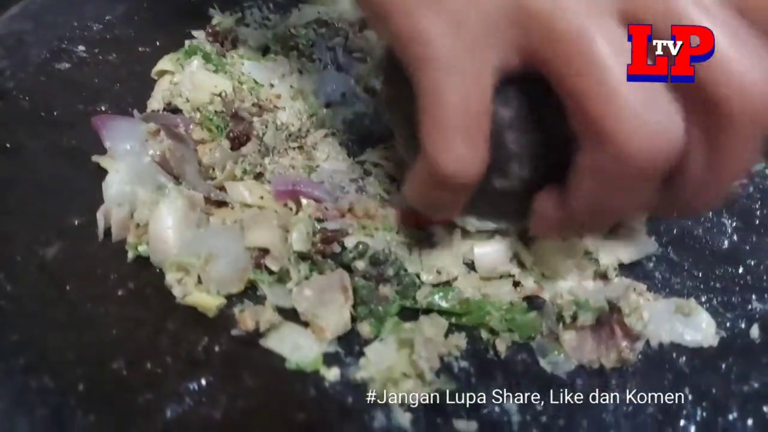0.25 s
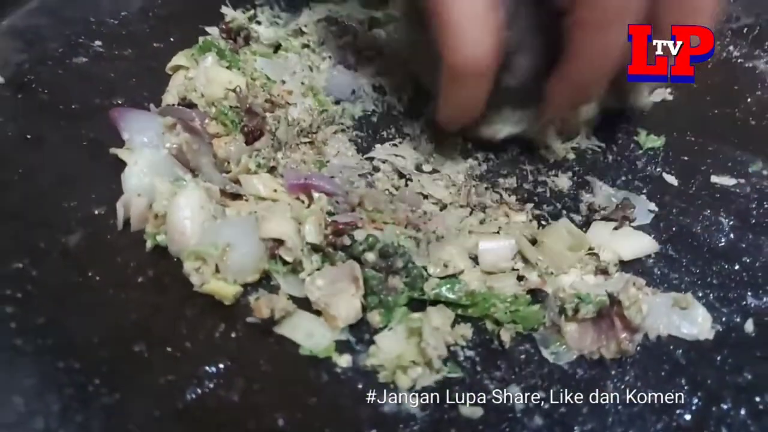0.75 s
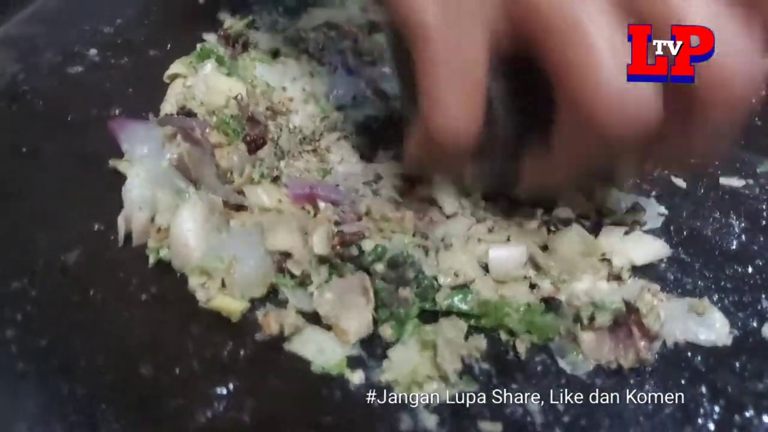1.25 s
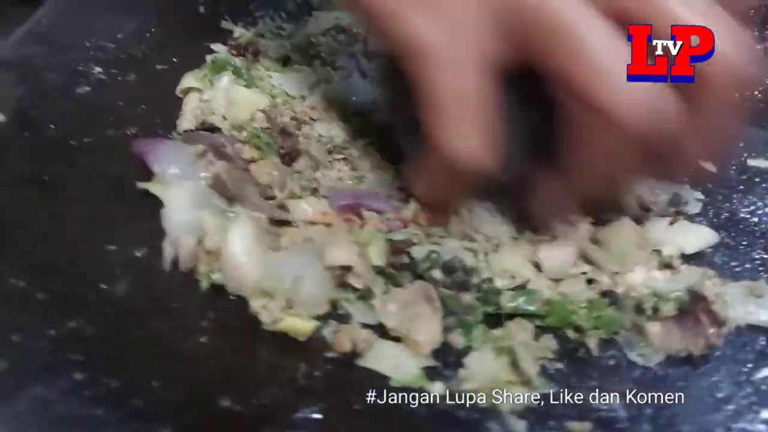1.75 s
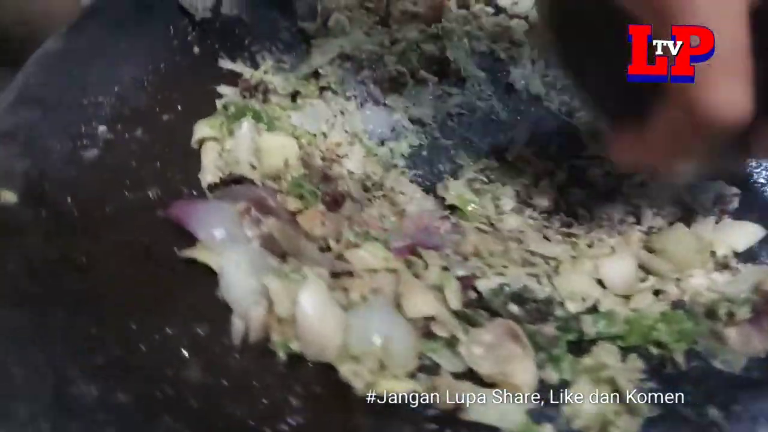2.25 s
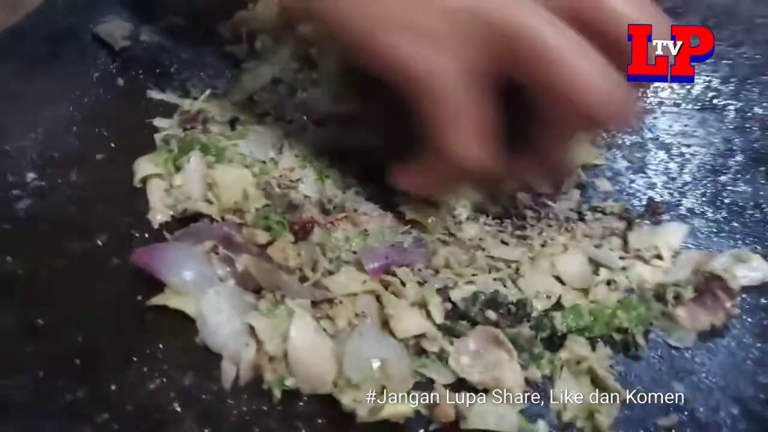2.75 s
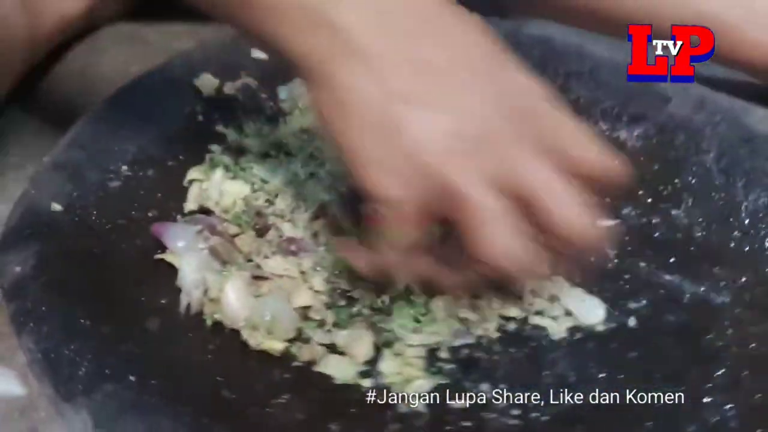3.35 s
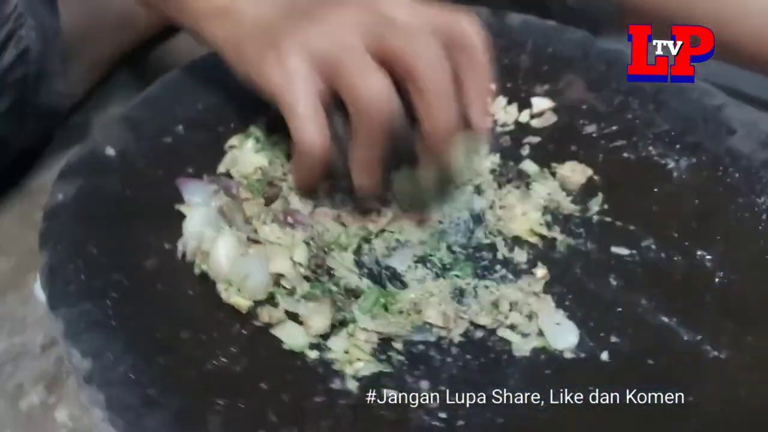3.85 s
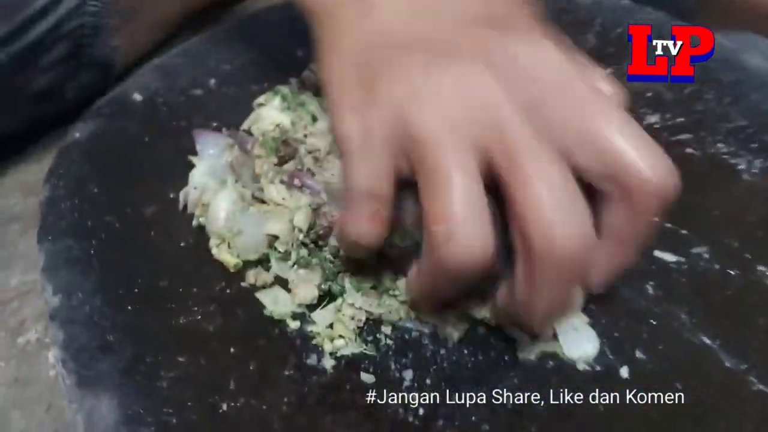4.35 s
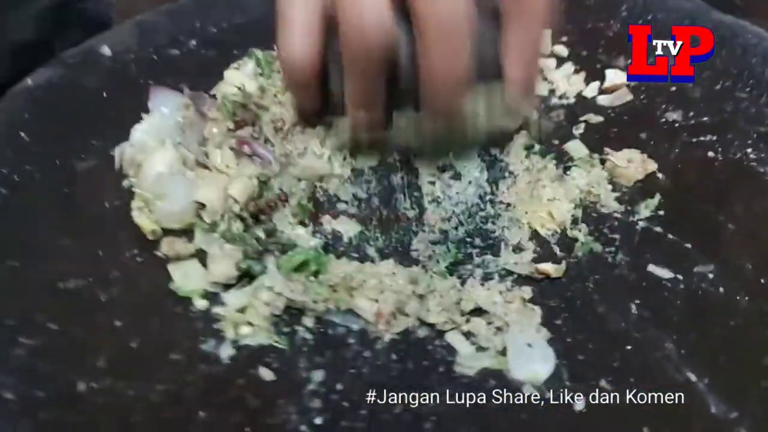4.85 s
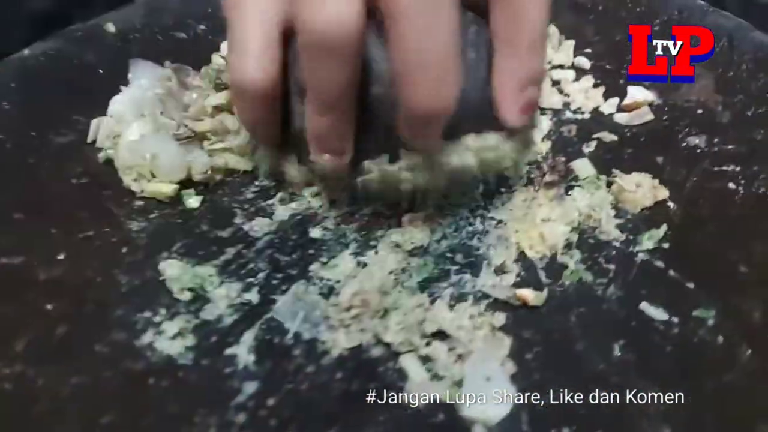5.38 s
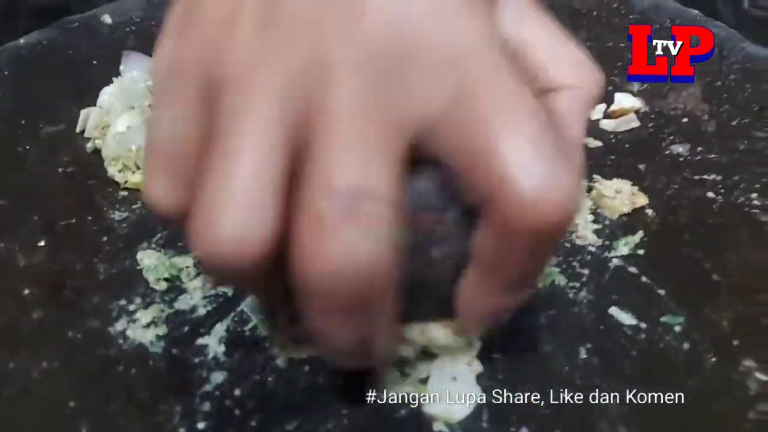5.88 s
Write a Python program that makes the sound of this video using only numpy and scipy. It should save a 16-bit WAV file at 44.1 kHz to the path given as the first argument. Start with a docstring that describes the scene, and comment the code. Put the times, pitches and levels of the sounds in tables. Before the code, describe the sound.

After a quiet start with faint low engine drone, a stone thumps down on a thick slab, then knocks and scrapes through paste about three times a second. Several strikes clack with a short hard ring. The second half is duller, faster, wetter grinding, hissy and crackling, leaning left. A tiny squeak, a heavy microphone bump and skin rubbing on the left follow. Close microphone, slight room reflection.

```python
"""In a room, a hand stone pounds and grinds spice paste on a thick round stone slab, close to a two-port microphone.
Each blow gives a noise crack, a thud of low modes of the slab on the ground, and a short ring of its own modes.
Strokes swell a hiss, crunch and rumble of noise; grit crackles, seeds snap and the stone squeaks once.
A finger brushes and taps the left port; far off an engine drones on sine orders, over a bed of air noise."""
import sys
import numpy as np
from scipy import signal
from scipy.fft import rfft, irfft, next_fast_len
from scipy.io import wavfile

SR = 44100
rng = np.random.default_rng(int(sys.argv[2]) if len(sys.argv) > 2 else 0)


def store_pcm(level_fs):
    """Save levels as 16-bit WAV."""
    pcm = np.round(np.clip(level_fs, -1, 1) * 32767).astype(np.int16)
    wavfile.write(sys.argv[1], SR, np.atleast_2d(pcm).T)


N = 269892

# blows of the hand stone, relative levels: (t/s, thud level/dB, knock level/dB, ring level/dB, crack level/dB,
# strike angle round the slab/rad, hardness/dB per octave)
BLOWS = [(0.744, -13, -53, -35.5, -17, 0.96, -3.5), (0.79, -47, -56, -44, -47, 0.76, 0),
         (0.83, -25.5, -35, -36, -32, 1, 5.5), (0.866, -36, -40, -46.5, -43, 0.91, -1),
         (1.118, -10, -18.5, -21, -12.5, 1.07, -10), (1.228, -32.5, -64, -44.5, -47, 0.71, 7.5),
         (1.453, -27, -14, -8.5, -36, 1.19, -3.5), (1.767, -18.5, -43.5, -45.5, -27.5, 0.83, 5),
         (1.856, -43, -38.5, -46.5, -20.5, 1, 13.5), (2.07, -17.5, -27, -49, -21, 0.3, 14.5),
         (2.309, -27.5, -52, -61.5, -55, .8, -4), (2.363, -12.5, -16.5, -29.5, -15, .8, -10),
         (2.659, -35, -14, -12, -34, 0.68, 0.5), (2.957, -24.5, -48, -40.5, -18.5, 0.33, -12),
         (3.297, -31.5, -12, -8.5, -27, 0.39, -1.5), (3.447, -30.5, -52, -48, -49, 1, -5),
         (3.634, -26.5, -33.5, -49.5, -19, 0.36, 16.5), (4.045, -36, -66, -53, -49, 0.88, -6),
         (4.347, -64, -56, -58, -33.5, 1.1, 2), (4.38, -23.5, -19, -30, -49, 0.25, -13),
         (4.392, -23.5, -24.5, -59, -50, .2, -10), (4.425, -21, -37, -54, -50, .2, -7),
         (4.698, -24.5, -33, -47, -63, 0.84, -19), (5.044, -20, -50, -47, -49, .8, -6),
         (5.412, -28, -42, -51, -39.5, .8, -7)]


def from_db(db):
    """Decibels to gain."""
    return 10 ** (np.asarray(db) / 20)


def rms_one(x):
    """Scale to rms 1."""
    return x / np.sqrt(np.mean(x ** 2) + 1e-20)


def in_time(rows):
    """Table columns as curves, one value a sample."""
    s, *columns = np.transpose(rows)
    return [np.interp(np.arange(N) / SR, s, c) for c in columns]


def at_hz(points, hz):
    """Read a spectrum on a log-frequency axis."""
    table_hz, values = np.transpose(points)
    return np.interp(np.log(hz), np.log(table_hz), values)


def drift(rate_hz):
    """Slow chance of rms 1: noise through a double pole at rate_hz, drawn every 40 samples."""
    r = np.exp(-2 * np.pi * rate_hz * 40 / SR)
    noise = rng.standard_normal(N // 40 + 2002)
    slow = signal.lfilter([1], [1, -2 * r, r * r], noise)[2000:]   # skip the settling
    return np.interp(np.arange(N) / 40, np.arange(len(slow)), rms_one(slow))


def ring(drive, hz, t60, lead=0):
    """A unit click sets a decaying sine of height 1 ringing, starting at phase lead."""
    r, w = from_db(-60 / (t60 * SR)), 2 * np.pi * hz / SR
    return signal.lfilter([np.sin(lead), r * np.sin(w - lead)], [1, -2 * r * np.cos(w), r * r], drive + 1e-18)


def dying(drive, t60):
    """Each click jumps to its size and decays by 60 dB in t60 seconds."""
    return signal.lfilter([1], [1, -from_db(-60 / (t60 * SR))], drive)


def clicks(times, sizes):
    """A click train."""
    out = np.zeros(N)
    np.add.at(out, (np.asarray(times) * SR).astype(int), sizes)
    return out


def filtered(x, hz, kind, order=2):
    """Butterworth filter."""
    return signal.sosfilt(signal.butter(order, hz, kind, fs=SR, output="sos"), x)


def swells(start, rise, hold, level_db, fade_db_per_s, pan_db=0):
    """Each event rises, holds and fades; overlapping ones add up. Stereo gain."""
    rise_db = 28   # an event starts this far below its full level
    out, t = np.zeros((2, N)), np.arange(N) / SR
    events = np.broadcast_arrays(start, np.asarray(rise) + .001, hold, level_db, pan_db)
    for s, up, on, db, pan in zip(*events):
        end = s + up + on + 60 / fade_db_per_s
        i = slice(round(s * SR), round(end * SR))
        loss = rise_db * np.clip(1 - (t[i] - s) / up, 0, 1)
        loss = loss + fade_db_per_s * np.maximum(t[i] - s - up - on, 0)
        out[:, i] += from_db(db - loss + pan / 2 * np.array([[1], [-1]]))
    return out


def coloured(spectrum, patchy_db, grain_db):
    """Half-octave bands of stereo noise with own flicker; grains swell all bands at once; rms 1."""
    # how alike the two ports hear noise: (f/Hz, left-right correlation)
    likeness = [(60, 0.5), (300, 0.38), (1000, 0.13), (3000, 0.13), (12000, 0.018)]
    out, edges = 0, 25 * 2 ** np.arange(0, 9.6, .5)
    white = rng.standard_normal((2, 2, N)) * from_db(grain_db * drift(46))
    for k, (low, high) in enumerate(zip(edges, edges[1:])):
        hz = np.sqrt(low * high)
        if spectrum[0][0] / 2 < hz < spectrum[-1][0] * 2:
            mid, side = filtered(white[k % 2], [low, high], "band")   # neighbours use separate noise
            alike = np.clip(at_hz(likeness, hz), -1, 1)
            gain = from_db(at_hz(spectrum, hz) + patchy_db * drift(12.0))
            out = out + gain * (np.sqrt(1 + alike) * mid + np.sqrt(1 - alike) * side * [[1], [-1]])
    return rms_one(out)


def slab(rubbing):
    """Blows and rubbing grit ring the slab; each port hears every mode from its own side of the node lines."""
    # slab modes: (f/Hz, left relative level/dB, right relative level/dB, t60/s,
    # member: 0 or 1 of a pair, 2 alone, right port's phase lead/rad)
    modes = [(737, -14, -14, 0.078, 0, 1.2), (759, -7, -8, 0.098, 1, 0.21),
             (995, -15.5, -15.5, 0.038, 2, 0.73), (1260, -50, -21.5, 0.1, 2, 0.17),
             (1284.5, -6.5, 4, 0.24, 0, 2.17), (1358, -9.5, 2, 0.23, 1, 1.69),
             (1482, -15, -29.5, 0.05, 2, 0.7), (1896, -28.5, -16, 0.16, 2, 5.4),
             (2195, 0, -10.5, 0.07, 0, 2.9), (2239, -3, -3, 0.19, 1, 0.85),
             (2400, -38, -15.5, 0.093, 2, .5), (2965, -8.5, -11.5, 0.075, 1, .8),
             (4290, -17.5, -18, .1, 0, 0.74), (4700, -19, -21.5, 0.059, 2, 0.27)]
    s, _, _, ring_db, _, angle, hardness_db = np.transpose(BLOWS)
    share = [np.cos(angle), np.sin(angle), 1]   # how far the strike angle wakes each member
    spread_db = rng.normal(0, 1, (len(s), len(modes)))
    out = 0
    for k, (hz, left_db, right_db, t60, member, lead) in enumerate(modes):
        tilt_db = hardness_db * np.log2(hz / 1300)   # bare stone on stone wakes the high modes, paste damps them
        sizes = from_db(ring_db + tilt_db + spread_db[:, k]) * share[round(member)]
        drive = clicks(s, sizes) + rubbing

        def both_ports(decay_s):
            return np.array([ring(drive, hz, decay_s), ring(drive, hz, decay_s, lead)])

        early = from_db(7.0) * both_ports(0.58 * t60)   # the stone resting on the slab soaks up the first swing
        late = from_db(-21) * both_ports(3.2 * t60)   # lifted off, it leaves a faint free ring
        out = out + (both_ports(t60) + early + late) * from_db([[left_db - 7.5], [right_db - 11.5]])
    return filtered(out, 5200, "low")   # the ringing is softened above about 5 kHz


def thuds(rocking):
    """The whole slab jolts on the ground: a soft contact into low modes; a sharper knock favours the upper ones."""
    # slab bouncing on the ground: (f/Hz, relative level/dB, t60/s)
    bounces = [(131.7, 0.5, 0.12), (171.3, -0.5, 0.1), (221.3, 0, 0.05), (284, -3.5, 0.027),
               (365.3, -7, 0.12), (440, -10.5, 0.059), (523, -13.5, 0.084), (625.5, -7.5, 0.047)]
    s, thud_db, knock_db = np.transpose(BLOWS)[:3]
    spread_db = rng.normal(0, 3.9, (len(s), len(bounces)))
    out = 0
    for k, (hz, level_db, t60) in enumerate(bounces):
        tilt_db = 0.33 * (knock_db - thud_db + 11.0) * np.log2(hz / 150)
        drive = clicks(s, from_db(thud_db + tilt_db + spread_db[:, k])) + rocking
        out = out + from_db(level_db) * ring(drive, hz, t60)
    return 0.41 * filtered(out, 900, "low") * from_db([[-0.3], [0.3]])


def cracks():
    """Stone meets stone: a quick burst of bright noise, a dull noise knock and a longer mid-band clatter."""
    s, _, knock_db, ring_db, crack_db = np.transpose(BLOWS)[:5]
    crack = dying(clicks(s, from_db(crack_db)), t60=0.02) * rng.standard_normal((2, N))
    crack = filtered(crack, [2500, 11000], "band", order=1) * from_db([[-1.5], [1.5]])
    knock = dying(clicks(s, from_db(knock_db + 6.0)), t60=0.089) * rng.standard_normal(N)
    knock = filtered(knock, [330, 950], "band", order=3)
    clatter = dying(clicks(s, from_db(ring_db - 12)), t60=0.2) * rng.standard_normal((2, N))
    clatter = filtered(clatter, [650, 3200], "band", order=5)
    return crack + knock + clatter


def stroke_levels():
    """Gains of hiss, crunch and rumble: each stroke swells over the lull, and thuds rock the slab."""
    # strokes through the paste, rise lasts 1 ms longer: (t/s, rise/s, hold/s, hiss level/dB, crunch level/dB,
    # rumble level/dB, left-right level/dB), relative levels
    strokes = [(0.333, 0.074, 0.021, -47.5, -70, -71, -10), (0.732, 0.009, 0.073, -42.5, -54, -56, -6.5),
               (1.108, 0.0095, 0.065, -46.5, -53.5, -29.5, -6),
               (1.38, 0.082, 0.1, -51.5, -49.5, -39.5, -6.5),
               (1.754, 0.054, 0.055, -44, -62.5, -47.5, -2.5), (2.061, 0.0077, 0.09, -44, -61, -40, -0.5),
               (2.238, .012, 0.016, -60, -32.5, -42, -1), (2.351, .015, 0.11, -41, -54, -44.5, -2),
               (2.644, 0.028, 0.061, -43.5, -42.5, -39, 0), (2.948, 0.011, 0.099, -47, -66.5, -51.5, 0.5),
               (3.274, 0.036, 0.038, -48, -42, -35, -2), (3.432, 0.014, 0.014, -68, -66, -33, -6.5),
               (3.624, 0.014, 0.1, -43.5, -61, -52.5, -0.5), (3.945, .13, 0.033, -37.5, -57, -41.5, -1.5),
               (4.165, 0.018, 0.081, -40.5, -58.5, -52.5, -0.5), (4.332, 0.053, .08, -41.5, -65, -34.5, -1),
               (4.509, 0.031, 0.053, -39, -51.5, -43.5, -1), (4.681, 0.022, .11, -57.5, -51.5, -31.5, 5),
               (4.707, 0.054, 0.012, -38.5, -79, -61, -9), (4.857, 0.037, 0.039, -37, -43, -51, -7.5),
               (5.025, 0.023, 0.056, -44.5, -55.5, -31.5, -9.5), (5.163, 0.031, 0.016, -62, -69, -74, -3),
               (5.222, 0.026, 0.07, -50.5, -59, -62, -6), (5.4, 0.017, 0.067, -60, -57, -29.5, .5),
               (5.424, 0.043, 0.17, -48, -60.5, -48, -3), (5.736, 0.082, 0.03, -43, -66, -58, .5),
               (5.886, 0.027, 0.022, -48, -59, -63, 4)]
    # what is left between the strokes: (t/s, hiss level/dB, crunch level/dB, rumble level/dB), relative levels
    lull = [(0, -64.5, -67, -48), (.7, -65, -63, -40.5), (1.1, -63, -69, -49.5), (2, -64, -79.5, -61),
            (3, -76.5, -70, -72.5), (3.9, -76, -106, -78.5), (4.4, -77, -80, -79), (5.8, -71.5, -61.5, -58),
            (6.12, -90.5, -87, -68)]
    start, rise, hold, hiss_db, crunch_db, rumble_db, pan_db = np.transpose(strokes)
    s, thud_db = np.transpose(BLOWS)[:2]
    hiss, crunch, rumble = from_db(in_time(lull))
    hiss = hiss + swells(start, rise, hold, hiss_db, fade_db_per_s=195, pan_db=pan_db)
    crunch = crunch + swells(start, rise, hold, crunch_db, fade_db_per_s=164, pan_db=pan_db)
    rumble = rumble + swells(start, rise, hold, rumble_db, fade_db_per_s=147)[0]
    # after a thud the slab rocks, 8 dB under the thud's table level
    rumble = rumble + swells(s, 0.0082, 0, thud_db - 8, fade_db_per_s=326.5)[0]
    return hiss, crunch, rumble


def grind(hiss, crunch, rumble, grit):
    """The stone drags through paste: hissing and crunching noise, fine crackle and lumps rolling underneath."""
    # noise spectra: (f/Hz, relative level per Hz/dB)
    hiss_spectrum, crunch_spectrum = [(1060, -41.5), (1800, -37), (3540, 4.5), (3840, -7.5), (6840, -9.5),
                                      (10600, -14), (13800, -19.5), (15300, -8.5), (16000, -24)], [(300, 6), (600, 9), (1000, 1.5), (2000, 4), (3500, 2.5),
                                                    (5500, -13), (8000, -19.5)]
    # hiss above 8 kHz against the rest: (t/s, level/dB)
    treble = [(0, -12), (.7, -3.5), (1.2, -1), (1.8, -1.5), (2.3, -1), (3.2, 1.5), (3.7, -2), (4.1, -7),
              (4.8, -3), (5.3, 1), (6.12, 2)]
    sizzle = coloured(hiss_spectrum, patchy_db=3.0, grain_db=2.5)
    body = filtered(sizzle, 8000, "low", order=1)
    out = hiss * (body + from_db(in_time(treble)[0]) * (sizzle - body))
    out = out + from_db(-11.5) * hiss * crackle(per_s=550.0)
    out = out + from_db(1.5) * crunch * coloured(crunch_spectrum, patchy_db=2.0, grain_db=1.6)
    lumps = rms_one(filtered(grit, [350, 900], "band"))   # lumps rolling under the stone
    return out + from_db(-21) * rumble * lumps


def crackle(per_s):
    """Countless small grains crush at random, a few much louder than the rest; rms 1."""
    size_db = 8.1 * np.minimum(rng.exponential(1, N), 5)
    born = (rng.random(N) < per_s / SR) * from_db(size_db)
    puffs = dying(born, t60=0.0069)
    return rms_one(filtered(puffs * rng.standard_normal((2, N)), [2000, 11000], "band", order=1))


def snaps():
    """Single seeds break: short unpitched bursts up to two octaves wide, anywhere under the stone."""
    # seeds snapping: (t/s, relative peak level/dB, centre f/Hz, left-right level/dB)
    seeds = [(0.2949, -35.5, 3760, -12), (0.345, -37, 4500, -16), (0.4341, -29, 3560, -15),
             (1.1596, -23, 3380, -11), (1.2676, -36, 3627, -6), (1.8768, -10.5, 4460, 15.5),
             (2.189, -23, 7600, -3), (2.4877, -27, 3970, -3), (3.0094, -26.5, 7230, -6),
             (3.763, -22, 7640, 5), (3.982, -33, 4350, -13), (4.182, -28, 3600, -17),
             (4.541, -27, 3430, -8), (4.561, -25, 6000, -6), (4.795, -16.5, 6500, -11),
             (4.805, -17, 4200, -9), (4.8888, -25, 3740, -20), (5.038, -26, 4690, -14),
             (5.1718, -29.5, 3550, -11), (5.3175, -27, 6600, -15), (5.624, -17.5, 5870, -3),
             (5.7381, -32, 4970, -6), (5.7786, -19.5, 10600, -6), (5.8348, -28, 6130, 6),
             (5.9297, -22, 9700, 3)]
    out, t = np.zeros((2, N)), np.arange(400) / SR
    for s, peak_db, hz, pan_db in seeds:
        burst = rng.standard_normal((2, 400)) * from_db(-60 * t / 0.002)   # t60 of 2 ms
        burst = filtered(burst, [hz / 2, min(hz * 2, .45 * SR)], "band")
        gain = from_db(peak_db - 3.0 + pan_db / 2 * np.array([[1], [-1]]))
        i = round(s * SR)
        out[:, i:i + 400] += gain * burst / np.abs(burst).max()
    return out


def squeak():
    """The stone slips on a bare patch and chirps once: a sine under a bell-shaped swell, stronger on the right."""
    centre_s, width_s, hz, level_db = 5.086, 0.0056, 2263, -30
    t = np.arange(N) / SR - centre_s
    swell = np.exp(-.5 * (t / width_s) ** 2)
    return from_db(level_db) * swell * np.sin(2 * np.pi * hz * t) * [[.3], [1]]


def finger():
    """Skin drags over the left port and taps it: each tap a pressure push and a slower rebound."""
    # finger rubbing the left port, rise lasts 1 ms longer: (t/s, rise/s, hold/s, level/dB)
    rubs = [(4.851, 0.033, 0.22, -38.5), (5.287, .02, .005, -41), (5.456, 0.019, .06, -28),
            (5.556, 0.022, 0.019, -36), (5.653, 0.027, .005, -48.5)]
    # finger tapping the left port: (t/s, relative level/dB)
    taps = [(5.1335, 3), (5.309, -26), (5.685, -36.5), (5.811, -35.5), (5.865, -33.5)]
    width_s = 0.001
    skin = filtered(rng.standard_normal(N) * from_db(3.24 * drift(64)), [150, 2000], "band")
    rubbing = swells(*np.transpose(rubs), fade_db_per_s=650)[0] * rms_one(skin)
    t = np.arange(1500) / SR
    push = np.clip(t / (0.5 * width_s), 0, 1)
    push = push - 1.72 * np.clip((t - width_s * 1.02) / (0.25 * width_s), 0, 1)   # swings below zero
    s, tap_db = np.transpose(taps)
    tapping = signal.fftconvolve(clicks(s, from_db(tap_db)), push * np.exp(-t / 0.0092))[:N]
    return np.outer([1, 0], rubbing + tapping)   # left port only


def room(x):
    """Six feedback delays a side, duller on every round."""
    t60_s, wall_cut_hz = 0.3, 6100
    size = next_fast_len(N + SR)
    w = 2 * np.pi * np.arange(size // 2 + 1) / size
    dull = 1 / (1 + 1j * w * SR / (2 * np.pi * wall_cut_hz))
    out = []
    for lags in rng.uniform(0.01, .034, (2, 6)) * SR:
        loops = [from_db(-60 * lag / SR / t60_s) * dull * np.exp(-1j * w * lag) for lag in lags]
        response = sum(g / (1 - g) * (-1) ** k for k, g in enumerate(loops))   # alternate signs
        out.append(irfft(rfft(x, size) * response, size)[:N])
    return np.array(out)


def engine():
    """Firing orders of a distant engine, wavering with the air, a thin whine and a brief whistle."""
    # far engine: (t/s, relative drone level/dB, relative second-order boom level/dB, whine level/dB)
    levels = [(0, -59, -52, -64.5), (.3, -44.5, -54, -69), (.55, -49, -40.5, -70), (.85, -55.5, -43.5, -93),
              (1.4, -53, -37.5, -69.5), (1.7, -67, -62, -81), (3.2, -63.5, -78, -75), (3.7, -62, -53, -69),
              (4.3, -76, -60.5, -78), (5, -48.5, -46, -95), (6.12, -84, -76, -94)]
    # drone partials: (multiple of the firing f, relative level/dB)
    orders = [(1, 16.5), (3, -19.5), (4, -8.5), (5, -20.5), (7, -13), (8, -15.5), (11, -11.5)]
    # whistle, rise lasts 1 ms longer: (t/s, rise/s, hold/s, level/dB)
    whistles = [(0.566, 0.061, 0.11, -59.5)]
    firing_hz, whine_hz, whistle_hz = 35.55, 649, 1134
    drone_db, boom_db, whine_db = in_time(levels)
    phase = 2 * np.pi * np.cumsum(firing_hz * (1 + 0.0036 * drift(3.0))) / SR
    drone = 0
    for k, level_db in orders:
        drone = drone + from_db(level_db + 3.0 * drift(4.4)) * np.sin(round(k) * phase + k * k)
    boom = from_db(boom_db + 0.7 * drift(5)) * np.sin(2 * phase)
    whine = rms_one(ring(rng.standard_normal(N), whine_hz, 0.3))   # noise through a narrow resonance
    whistle = rms_one(ring(rng.standard_normal(N), whistle_hz, 0.4))
    whistle = swells(*np.transpose(whistles), fade_db_per_s=280) * whistle
    return from_db(drone_db) * drone + boom + from_db(whine_db) * whine + whistle


def air():
    """The background bed: steady wide noise, strongest in the bass, with a flicker in every band."""
    # air noise: (f/Hz, relative level per Hz/dB)
    air_spectrum = [(15, -38), (25, 2), (59, 17), (141, 4.5), (293, -6.5), (641, -24.5), (1040, -65),
                    (2160, -28.5), (12500, -19), (14800, -35), (16000, -44)]
    return from_db(-57) * coloured(air_spectrum, patchy_db=2.5, grain_db=3.5)


def scene():
    """Pounding, grinding, room, background and finger."""
    hiss, crunch, rumble = stroke_levels()
    grit = rng.standard_normal(N) * from_db(3.6 * drift(52))   # uneven contact force
    ringing = slab(from_db(-36) * crunch.mean(axis=0) * grit)
    blows = ringing + thuds(from_db(-28.5) * rumble * grit) + cracks()
    grinding = grind(hiss, crunch, rumble, grit) + snaps() + squeak()
    echoes = from_db(-15) * room(blows[0] + grinding[1])   # fed by left blows and right grinding
    return blows + grinding + echoes + finger() + engine() + air()


def record(dry):
    """The microphone's chain: a steep bass cut, a firm ceiling for the peaks, and the top is cut."""
    bass_cut_hz, top_cut_hz = 52.9, 16200   # the top is 60 dB down from top_cut_hz up
    thin = filtered(dry, bass_cut_hz, "high", order=5)
    limited = np.tanh(thin + thin ** 3 / 3)
    return signal.sosfilt(signal.cheby2(12, 60, top_cut_hz, fs=SR, output="sos"), limited)


dry = scene()
out = record(dry)
store_pcm(out)
```